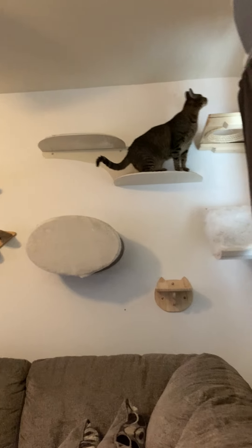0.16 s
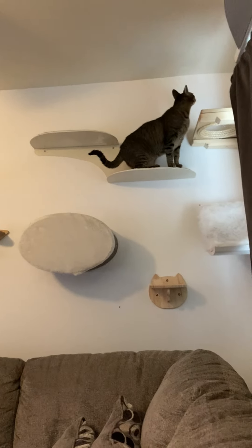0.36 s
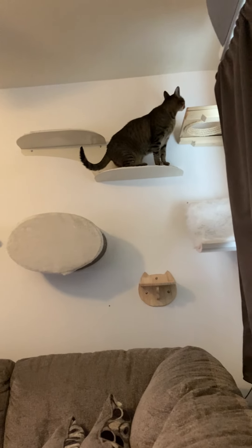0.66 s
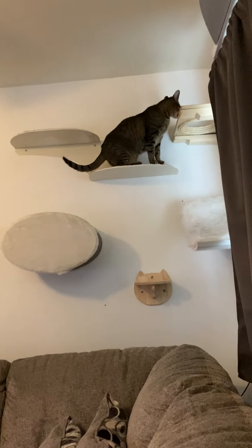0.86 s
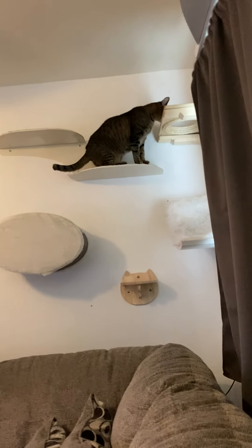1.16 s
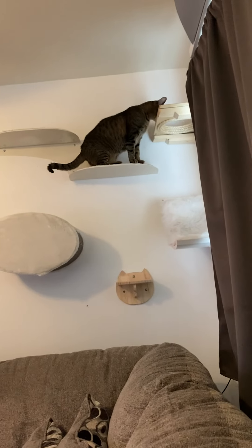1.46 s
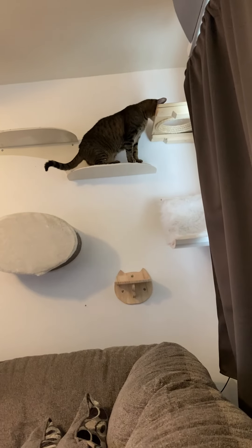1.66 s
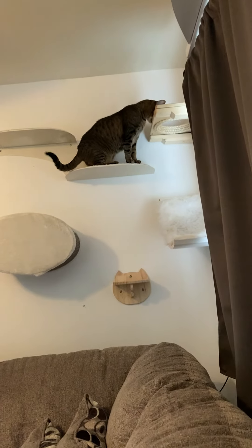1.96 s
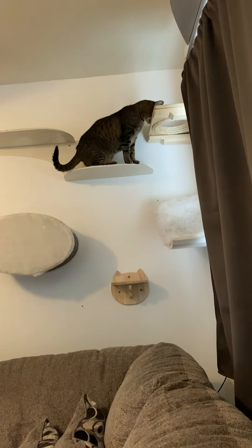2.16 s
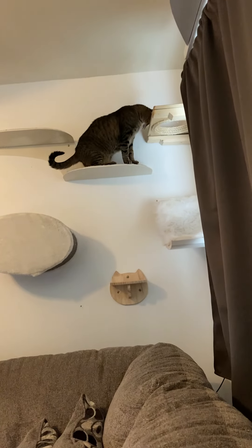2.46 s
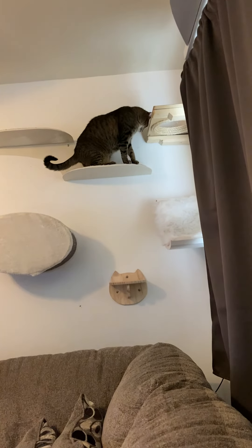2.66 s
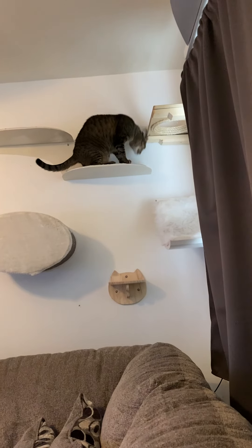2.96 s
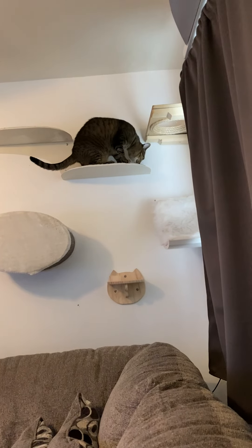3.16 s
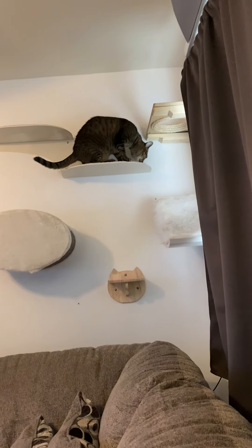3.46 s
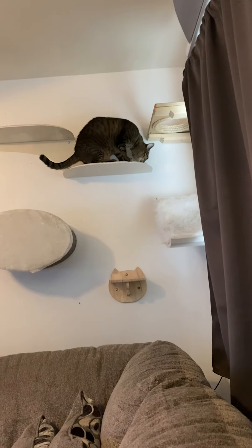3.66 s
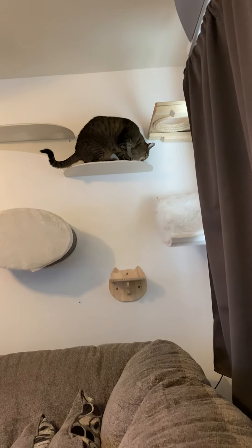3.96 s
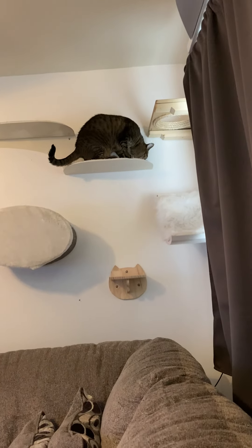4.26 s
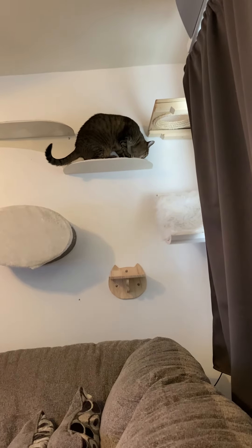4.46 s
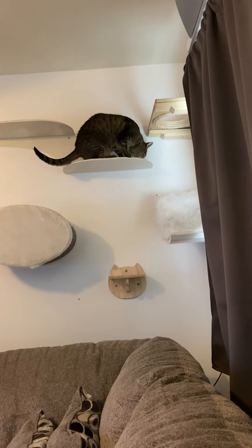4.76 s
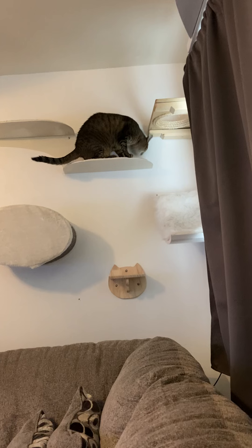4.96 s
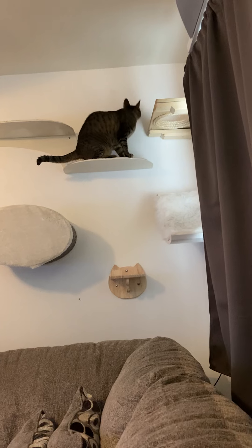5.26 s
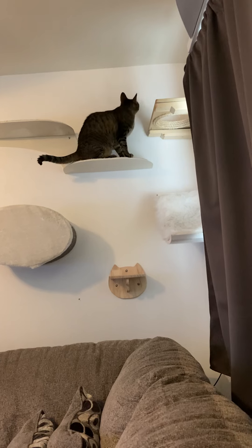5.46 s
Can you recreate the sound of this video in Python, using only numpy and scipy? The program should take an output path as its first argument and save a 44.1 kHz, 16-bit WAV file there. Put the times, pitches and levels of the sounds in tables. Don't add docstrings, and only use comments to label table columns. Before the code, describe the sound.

Low steady room rumble and soft hiss, with close rustling and ticking in the first second, then sparse tiny taps from a shelf.

```python
import sys
import numpy as np
from scipy import signal
from scipy.fft import rfft, irfft, next_fast_len
from scipy.io import wavfile
from scipy.ndimage import uniform_filter1d

SR = 44100
rng = np.random.default_rng(int(sys.argv[2]) if len(sys.argv) > 2 else 0)


def gain_from_db(level_db):
    decades = np.asarray(level_db, float) / 20
    return 10 ** decades


def generate_wav(sig):
    pcm = np.round(np.clip(np.atleast_2d(sig).T, -1, 1) * 32767).astype(np.int16)
    wavfile.write(sys.argv[1], SR, pcm)


N = 246783
SIZE = next_fast_len(N + 9000)
HZ = np.maximum(np.arange(SIZE // 2 + 1) * SR / SIZE, 1)
TIME = np.arange(N) / SR

# [freq_hz, density_db]
RUMBLE_SUM = [(19, -48.5), (32, -12.5), (49, -9), (68, -2), (86, 5.5), (129, -6), (178, -18.5),
              (205, -14.5), (244, -25), (387, -22), (434, -26.5), (459, -32), (562, -41.5), (728, -42.5),
              (1000, -64), (1300, -96.5), (2200, -120)]
# [freq_hz, density_db]
RUMBLE_DIFFERENCE = [(30, -26.5), (52, 0), (68, -5), (100, -1), (128, -5), (146, -19.5), (227, -13),
                     (247, -16.5), (424, -10), (519, -16), (707, -18.5), (1000, -38.5), (1300, -70),
                     (2200, -120)]
# [freq_hz, density_db]
HISS_SUM = [(530, -32.5), (900, -3.5), (1100, -2.5), (1210, -0.5), (2200, -3), (2570, -2.5), (3380, -8),
            (4000, -5), (5450, -13), (9110, -4.5), (10800, -12.5), (11700, -22.5), (13300, -12),
            (15050, -12.5), (15250, -30.5)]
# [freq_hz, density_db]
HISS_DIFFERENCE = [(530, -25.5), (900, -1), (1120, -5.5), (1200, -3.5), (2110, -11), (2650, -11.5),
                   (5990, -17), (7790, -22), (8540, -36), (9370, -25.5), (11400, -15), (13200, -23),
                   (14000, -27)]
# [centre_hz, width_hz, lift_db]
ROOM_MODES = [(31.6, 5, -9), (51, 27, 4), (113.7, 24.4, -6), (134.5, 6.2, -15), (149.7, 25, 7.5),
              (169, 2.7, -9.5), (178.5, 7.1, 11.5), (199.3, 5.1, 3.5), (220.4, 13, 8), (293.7, 11, -8.5),
              (330, 11, -5.5), (350.2, 3.5, 8.5), (389.3, 20, 5.5), (431.4, 7.3, 8), (567.7, 26, 11),
              (732.4, 18, 6.5), (789, 170, 5.5)]
# [peak_s, peak_db, pitch_hz]
DUCT_GUSTS = [(0.0, -36.5, 94.8), (0.192, -45.5, 79.55), (0.259, -37.5, 84.64), (.7, -41.5, 83.97),
              (1.219, -37, 81.14), (1.371, -41.5, 83.5), (1.53, -42, 73.4), (1.739, -53, 71.7),
              (1.93, -36, 86.16), (2.25, -54, 86.98), (2.51, -41.5, 92.77), (2.72, -51, 87.8),
              (2.95, -37.5, 84.16), (3.161, -37.5, 82.6), (3.32, -35, 79.77), (3.63, -41.5, 79.8),
              (3.99, -41, 84.64), (4.151, -43.5, 82.73), (4.409, -40, 81.95), (4.301, -46, 84.84),
              (4.56, -40, 82.35), (4.708, -36, 82.13), (5.053, -43, 80.18), (5.189, -43, 80.5),
              (5.279, -40.5, 83.76), (5.402, -34.5, 79.87), (5.525, -45, 80.52), (5.586, -35, 84.2)]
# [pitch_hz, level_db (rms)]
MAINS_HUM = [(120, -52)]
# [freq_hz, density_db]
WEAVE_COLOUR = [(590, -62), (1000, -5.5), (1270, -5.5), (1570, -13), (2060, -11), (2780, -7), (3460, -6.5),
                (5050, -5.5), (6580, -12.5), (9290, -4.5), (11200, -6.5), (12000, -9), (12800, -12),
                (14600, -3.5), (15700, -12.5)]
# [freq_hz, level_db]
NEAR_DIFFERENCE = [(600, 8.5), (1200, 7), (1800, 3), (2700, 0), (3400, 2.5), (3950, -1.5), (4350, -10),
                   (4800, -0.5), (6200, 5.5), (7600, -2), (8600, -21.5), (9500, -4.5), (11000, 5),
                   (12000, 6), (13000, -3), (13900, 1), (14200, -22)]
# [start_s, strength_db, length_s]
TAG_SHAKES = [
    (0.099, -75, 0.0094),
    (.112, -70, 0.028),
    (.4, -70, 0.013),
    (0.647, -80.5, 0.018),
    (0.804, -78.5, 0.016),
]
# [pitch_hz, level_db, t60_s]
TAG_MODES = [(8310, -7, .05), (8910, -8, .04), (9125, 0, .07), (9275, -4, .05), (9400, 2, .08),
             (10500, -10, .05), (10790, -8, .06), (11050, -7, .05), (13250, -12, .08), (14540, -4, .05),
             (14650, 0, .06)]
# [start_s, peak_db, centre_hz, width_octaves, t60_s]
CLAW_TICKS = [(.085, -62, 4750, 0.43, .012), (.0966, -58, 3060, 1.6, .05), (.0982, -46, 4500, .6, 0.015),
              (.0985, -54, 9000, .9, .004), (.0988, -62, 14000, 0.26, .004), (.1045, -53, 4430, 1.2, 0.011),
              (.1047, -57, 8500, 0.94, .004), (.106, -50, 3340, .25, 0.043),
              (.1085, -46.5, 5000, 0.53, 0.023), (.11, -62, 6600, 0.76, .005),
              (.114, -47, 4160, 1.6, 0.013), (.119, -60, 4500, 1.1, .01), (.124, -64, 9400, .05, .03),
              (.14, -75, 1240, .15, .15), (.148, -64, 5300, .45, .02), (.352, -58, 2200, 0.15, .02),
              (.408, -58, 9150, 0.054, 0.037), (.624, -74, 8950, .5, .01), (.685, -65, 3000, 1.4, .01),
              (.686, -58, 644, 0.55, 0.1), (.688, -60, 1800, 1.8, 0.022), (.6945, -58, 1900, 1.1, 0.012),
              (.722, -69, 1400, 0.37, .025), (.801, -61, 4570, 0.91, 0.081),
              (.809, -59.5, 4270, 0.79, 0.071), (.858, -77, 1340, 0.17, .06)]
# [start_s, peak_db, centre_hz, width_octaves, t60_s]
HAND_GRIP = [(.9193, -76, 4220, .13, .015), (.929, -66, 1000, .92, .2), (.942, -59, 900, 0.77, 0.14),
             (.935, -68, 1900, 0.33, .012), (.951, -60, 2950, 0.35, .01), (.9572, -51, 900, 1.6, 0.02),
             (.9575, -47.5, 3480, 1.07, 0.013), (.9582, -68, 14500, 0.4, .005),
             (0.961, -57, 4450, 0.16, 0.011), (.965, -61, 8000, 1.4, .008), (0.973, -57.5, 3700, 1.2, .008),
             (.973, -53.5, 7000, 0.75, 0.0088), (.9732, -68, 9500, 0.44, .007),
             (0.9727, -63, 14100, .35, .006), (.979, -61, 2400, .3, .012), (.98, -63, 7500, 1.6, .008),
             (.981, -63, 9200, 0.27, .007), (.9812, -62.5, 14000, .3, .006), (.99, -59.5, 4730, 0.27, .011),
             (.997, -66, 3500, 1.6, .012), (1.001, -65, 8400, .65, .01), (1.016, -69, 7160, .2, .008),
             (1.045, -74, 1350, 0.26, .03), (1.1, -72, 7400, .4, .008), (1.3, -66.5, 610, .41, .069)]
# [start_s, peak_db, centre_hz, width_octaves, t60_s]
PAW_SHIFT = [(2.648, -68, 2160, 1.5, .015), (2.649, -69, 1900, 1, 0.013), (2.651, -75, 9500, .4, .01),
             (2.6515, -72, 4000, .4, .01), (2.652, -72, 7000, .6, .012), (2.66, -74, 5900, 0.11, .06),
             (2.668, -61, 2000, .88, 0.023), (2.669, -69, 7000, 0.46, 0.022),
             (2.672, -67, 3600, 0.37, .012), (2.675, -71, 1400, .3, .04), (2.678, -66, 1960, 0.8, .02),
             (2.678, -65, 4080, 0.55, 0.024), (2.686, -68, 3066, .98, .02), (2.686, -65, 1900, 0.66, .02),
             (2.687, -72, 6876, .45, .015), (2.69, -73, 1350, 0.36, .04), (2.7, -76, 7000, 0.65, .012),
             (2.701, -67, 2240, 0.84, .015), (2.729, -75, 1800, .8, .012), (2.868, -71.5, 2320, .28, .04),
             (2.889, -70, 3420, 1, 0.011)]
# [start_s, peak_db, centre_hz, width_octaves, t60_s]
SHELF_TAPS = [(2.88, -78, 1360, 0.14, .35), (2.9, -80, 1420, 0.17, .06), (2.94, -82, 1952, 0.15, .095),
              (2.96, -76.5, 1333, 0.15, .36), (2.995, -81, 1420, .12, .05), (3.03, -76, 1280, .2, .37),
              (4.737, -63, 3000, .6, 0.018), (4.7425, -61, 3050, 0.63, 0.017),
              (4.907, -76.5, 3960, .1, 0.021), (5.222, -79, 1380, .14, 0.041),
              (5.4752, -59, 4800, 0.9, .005), (5.4757, -62, 5630, 0.36, .012), (5.481, -76, 3900, .15, .04),
              (5.493, -78, 5916, .15, 0.039)]
# [start_s, peak_db, pitch_hz, t60_s]
HARD_PINGS = [(.099, -68, 13240, .2), (.1, -63, 3104, .09), (.108, -61, 3110, .1), (.2, -68, 4500, .06),
              (.214, -66, 2130, .05), (.298, -66, 4680, .08), (.348, -64, 2130, .06),
              (.406, -64, 9380, .06), (.65, -72, 4900, .04), (.652, -78, 2750, .1), (.667, -70, 9375, .04),
              (.692, -66, 1120, .05), (.721, -76, 5100, .02), (.81, -68, 9380, .06), (.812, -72, 7100, .03),
              (.846, -76, 3700, .03), (.959, -59, 760, .04), (1.511, -65, 570, .09),
              (1.535, -78, 1330, .06), (1.552, -76, 1370, .07), (1.622, -76, 1240, .08),
              (1.655, -78, 1300, .05), (1.68, -79, 1270, .06), (4.737, -66, 3564, .028),
              (4.7375, -75, 1346, .065), (4.738, -73, 2869, .025), (4.7422, -66, 3600, .028),
              (4.7425, -67, 2870, .028), (5.475, -76, 1335, .06), (5.4753, -57, 3800, .014),
              (5.477, -72, 6148, .03), (5.488, -77, 3700, .025), (5.511, -76, 3950, .022)]
# [peak_s, half_length_s, level_db, pitch_hz, swish_db (over level)]
CLOTH_RUBS = [(0.06, 0.068, -74.5, 5130, -7), (0.111, 0.032, -62.5, 3400, 1.5),
              (0.15, 0.032, -69.5, 4700, 0.5), (0.212, 0.069, -71.5, 3630, -21),
              (0.214, 0.1, -69, 2120, -2.5), (0.23, 0.066, -73, 3580, 9), (0.27, 0.062, -75, 3420, 3.5),
              (0.312, 0.1, -70.5, 3950, -9), (0.359, 0.069, -69, 2070, -12), (0.361, 0.11, -70.5, 3560, 3),
              (0.394, 0.068, -71.5, 4600, 7), (0.522, 0.061, -84.5, 1580, -5.5),
              (0.585, 0.08, -85, 1600, -8.5), (.63, 0.1, -92, 2030, -18), (0.717, 0.087, -81, 1760, -6.5),
              (0.817, 0.02, -77.5, 5600, 6.5), (0.934, 0.041, -82.5, 2450, -11),
              (0.935, 0.036, -86, 4410, -12), (1, 0.027, -80.5, 4660, 5), (1.184, .07, -82.5, 4460, -14),
              (1.086, 0.065, -80.5, 4000, -8), (1.155, 0.1, -74, 4070, -14.5),
              (1.184, 0.08, -74.5, 2070, -30), (1.205, 0.042, -73.5, 3920, -9),
              (1.397, 0.15, -86.5, 1520, -21), (1.557, 0.13, -83.5, 1620, -24),
              (1.634, 0.073, -84, 1280, -23), (2.685, 0.045, -76.5, 2050, -12)]
# [start_s, fade_s, level_db, pitch_hz, swish_db (over level)]
CLOTH_FLICKS = [
    (0.647, 0.076, -82, 4847, 0),
    (0.688, 0.045, -75, 2720, -19),
    (.8, 0.059, -74, 4520, -11),
    (0.958, 0.14, -75, 1890, -4.5),
    (0.972, 0.029, -68.5, 2900, -2),
    (2.649, 0.03, -72.5, 2000, -9),
    (2.868, 0.12, -86.5, 2091, -6),
]
SWISH_PARTS = [-4.5, -9.5, -7.5]
# [start_s, end_s, low_hz, high_hz]
BAND_DROPOUTS = [
    (0.064, 0.123, 1000, 1800),
    (0.105, .17, 1390, 1800),
    (0.124, 0.184, 960, 1120),
    (.345, 0.417, 1420, 1520),
    (0.387, 0.423, 2420, 2530),
    (1.14, 1.196, 1220, 1470),
    (0.194, .27, 930, 1380),
    (0.272, 0.347, 900, 1670),
    (0.44, 0.49, 905, 1090),
    (2.65, 2.712, 5270, 5630),
]


def rms_one(x):
    return x / np.sqrt(np.mean(x ** 2) + 1e-20)


def at_hz(points):
    hz, value = np.transpose(points)
    return np.interp(np.log(HZ), np.log(hz), value)


def shape(x, gain):
    return irfft(rfft(x, SIZE) * gain, SIZE)[..., :N]


def band(low_hz, high_hz, order=4):
    return 1 / np.sqrt((1 + (low_hz / HZ) ** (2 * order)) * (1 + (HZ / high_hz) ** (2 * order)))


def drift(rate_hz):
    r = np.exp(-80 * np.pi * rate_hz / SR)
    noise = rng.standard_normal(N // 40 + 2002)
    slow = signal.lfilter([1], [1, -2 * r, r * r], noise)[2000:]
    return np.interp(np.arange(N) / 40, np.arange(len(slow)), rms_one(slow))


def air(spectrum, level_db, lift_db=0, white=None):
    white = rng.standard_normal(N) if white is None else white
    return gain_from_db(level_db) * rms_one(shape(white, gain_from_db(at_hz(spectrum) + lift_db)))


def ports(pair, side_db=0):
    alike = 0.7
    turned = np.sqrt(alike) * shape(pair[0], 1j) + np.sqrt(1 - alike) * pair[1]
    both = shape(pair[0], 1 - band(11400, 12450, order=60))
    return np.array([both, shape(turned, gain_from_db(at_hz(NEAR_DIFFERENCE) + side_db))])


def hum():
    return sum(np.sqrt(2) * gain_from_db(db + 1.1 * drift(0.72)) * np.sin(2 * np.pi * hz * TIME) for hz, db in MAINS_HUM)


def gusts():
    fade_db_per_s, lull_db = 184.5, -58
    s, peak_db, hz = np.transpose(DUCT_GUSTS)
    each_db = peak_db[:, None] - fade_db_per_s * np.abs(TIME - s[:, None])
    level_db = np.maximum(lull_db, np.max(each_db, axis=0))
    level_db = uniform_filter1d(level_db, size=900) - 3.0 + 1.7 * drift(56)
    turns = np.cumsum(np.interp(TIME, s, hz) + 1.435 * drift(6.9)) / SR
    return np.sqrt(2) * gain_from_db(level_db) * np.sin(2 * np.pi * turns)


def rumble():
    level_db, side_level_db, left_lift_db = -44, -63.5, 2.5
    alike = 0.2
    lift_db = sum(db / (1 + (2 * (HZ - hz) / width) ** 2) for hz, width, db in ROOM_MODES)
    hollow_db = -9 * band(81.4, 100.2) ** 2
    white, own = rng.standard_normal((2, N))
    wash = air(RUMBLE_SUM, level_db - 2.5, lift_db + hollow_db, white)
    wash = wash + shape(wash, band(520, 1600)) * (gain_from_db(1.4 * drift(12)) - 1)
    both = wash + gusts() + hum()
    side_noise = np.sqrt(alike) * shape(white, 1j) + np.sqrt(1 - alike) * own
    apart = air(RUMBLE_DIFFERENCE, side_level_db, 0.83 * lift_db, side_noise)
    lean = np.tanh(left_lift_db * np.log(10) / 40)
    return np.array([both, lean * shape(both, band(24, 320, order=1)) + apart])


def hiss():
    pair = np.array([air(HISS_SUM, -85.5), air(HISS_DIFFERENCE, -81.5)])
    far = 0
    for hz in (1000, 1500, 2250):
        far = far + shape(pair, band(hz, 1.5 * hz) ** 2) * (gain_from_db(1.8 * drift(12)) - 1)
    return pair + far


def ticks(rows, side_db, order, tail_db=-18, tail_t60=0.34):
    out, age = np.zeros((2, N)), np.arange(SR // 5) / SR
    for s, db, hz, octaves, t60 in rows:
        fade = gain_from_db(-60 * age / t60) + gain_from_db(tail_db - 60 * age / tail_t60)
        burst = rng.standard_normal((2, len(age))) * fade
        edges = np.clip([hz / 2 ** (octaves / 2), hz * 2 ** (octaves / 2)], 100, 18000)
        burst[:, 0] += 1.63 * np.sqrt(SR / 2 / (edges[1] - edges[0]))
        burst = signal.sosfilt(signal.butter(order, edges, "band", fs=SR, output="sos"), burst)
        burst *= gain_from_db([[db], [db + side_db]]) / np.abs(burst).max(axis=1, keepdims=True)
        i = round(s * SR)
        out[:, i:i + len(age)] += burst[:, :N - i]
    return out


def shelf():
    return ticks(SHELF_TAPS, -3, order=3, tail_db=-21.0, tail_t60=0.17)


def contacts():
    return ports(ticks(CLAW_TICKS + HAND_GRIP + PAW_SHIFT, 0, order=4))


def pings():
    side_db, soft_s = -1, 0.0003
    out, age = np.zeros(N), np.arange(SR // 4) / SR
    for s, db, hz, t60 in HARD_PINGS:
        i = round(s * SR)
        level = gain_from_db(db - 60 * age / t60) * (1 - np.exp(-age / soft_s))
        out[i:i + len(age)] += (level * np.sin(2 * np.pi * hz * age))[:N - i]
    return np.array([out, shape(out, 1j * gain_from_db(side_db + 0.5 * at_hz(NEAR_DIFFERENCE)))])


def ring(clicks, hz, t60):
    r, w = gain_from_db(-60 / (t60 * SR)), 2 * np.pi * hz / SR
    return signal.lfilter([0, np.sin(w)], [1, -2 * r * np.cos(w), r * r], clicks + 1e-18)


def tag():
    out = np.zeros((2, N))
    start_s, strength_db, length_s = np.transpose(TAG_SHAKES)[..., None]
    spots = rng.random((len(TAG_SHAKES), 6))
    at = ((start_s + length_s * spots ** 1.2) * SR).astype(int)
    for hz, mode_db, t60 in TAG_MODES:
        clicks = np.zeros((2, N))
        clicks[:, at] = gain_from_db(strength_db + mode_db) * rng.standard_normal((2, *at.shape))
        out += ring(clicks, hz, t60)
    return ports(out)


def fibre_grains():
    slips = (rng.random(N) < 2500 / SR) * gain_from_db(3 * np.minimum(rng.exponential(1, N), 5))
    grains = rms_one(slips) * rng.choice([-1, 1], (2, N))
    return rfft(grains + rng.standard_normal((2, N)), SIZE)


def cloth():
    s, fall, db, hz, swish_db = np.transpose(CLOTH_RUBS + CLOTH_FLICKS)[..., None]
    is_rub = np.arange(len(s))[:, None] < len(CLOTH_RUBS)
    rise = np.where(is_rub, fall, 0.003)
    coarse = TIME[::16]
    away = np.maximum((s - coarse) / rise, (coarse - s) / fall)
    fade_db = 22 * away ** np.where(rise < fall, 1, 1.5)
    power = gain_from_db(2 * (db - fade_db))
    edges = np.append(np.geomspace(1100, 6500, 12), [8500, 11900, 15400])
    ratio = np.sqrt(edges[:-4] * edges[1:-3]) / hz
    skirt = 0.14 * np.minimum(ratio, 1) ** 1.4
    share = (skirt + np.exp(-(np.log(ratio) / 0.15) ** 2)) ** 2
    share = share / share.sum(axis=1, keepdims=True)
    share = np.hstack([share, gain_from_db(2 * (swish_db + SWISH_PARTS))])
    grains, colour = fibre_grains(), gain_from_db(at_hz(WEAVE_COLOUR))
    out = 0
    for low, high, level in zip(edges, edges[1:], np.sqrt(share.T @ power)):
        fibres = rms_one(irfft(grains * band(low, high, order=10) * colour, SIZE)[:, :N])
        out = out + fibres * np.interp(TIME, coarse, level) * gain_from_db(2.6 * drift(24))
    return ports(out)


def drop_bands(both):
    edge_s, lost_share = 0.015, 0.99
    for start, end, low_hz, high_hz in BAND_DROPOUTS:
        lost = lost_share * np.clip(np.minimum(TIME - start, end - TIME) / edge_s + 0.5, 0, 1)
        both = both - shape(both, band(low_hz, high_hz, order=24)) * lost
    return both


def scene():
    both, side = rumble() + hiss() + shelf() + contacts() + pings() + tag() + cloth()
    both = drop_bands(both)
    side = shape(side, band(10, 13850, order=40))
    return np.array([both + side, both - side])


def roll_off(x):
    return signal.sosfilt(signal.butter(12, 15730, fs=SR, output="sos"), x)


def record(dry):
    return roll_off(dry)


dry = scene()
out = record(dry)
generate_wav(out)
```